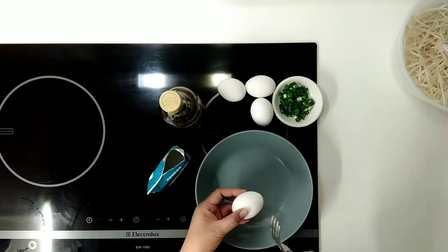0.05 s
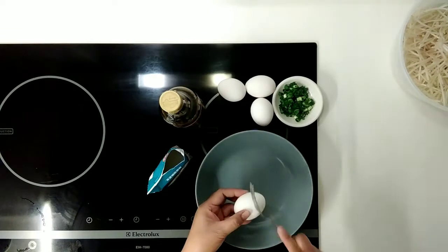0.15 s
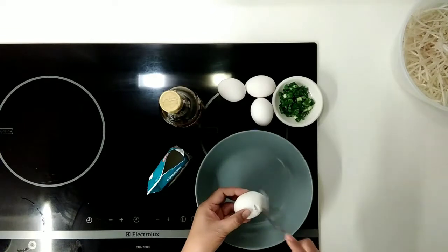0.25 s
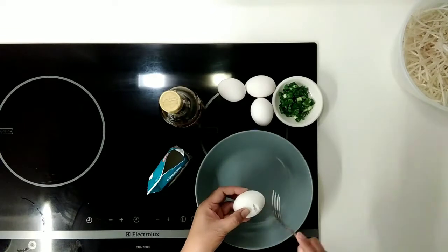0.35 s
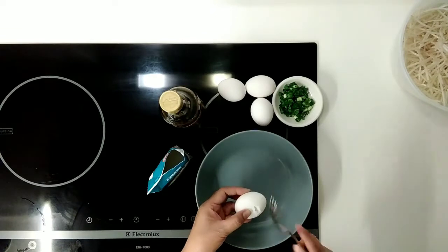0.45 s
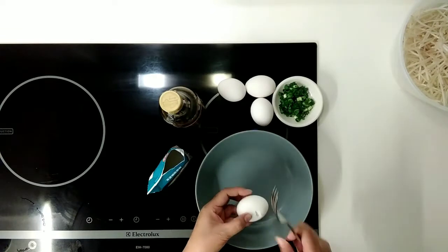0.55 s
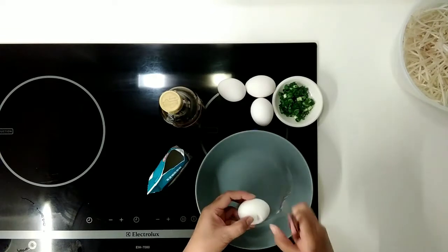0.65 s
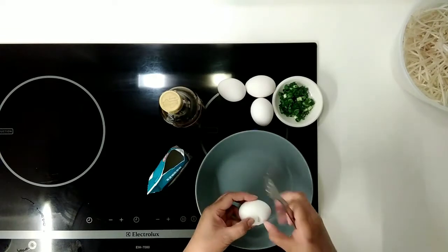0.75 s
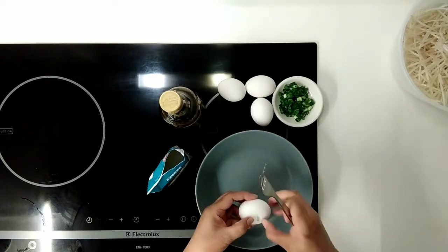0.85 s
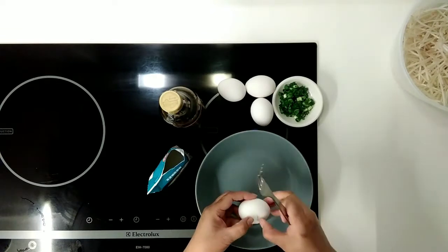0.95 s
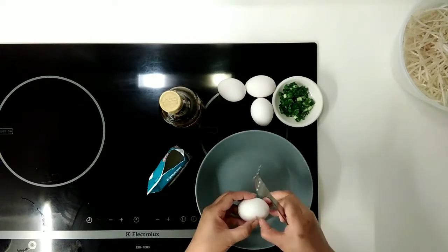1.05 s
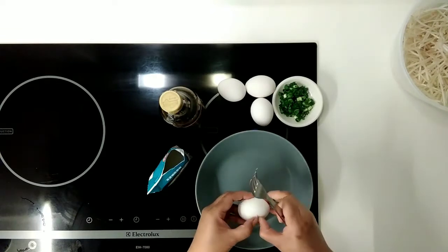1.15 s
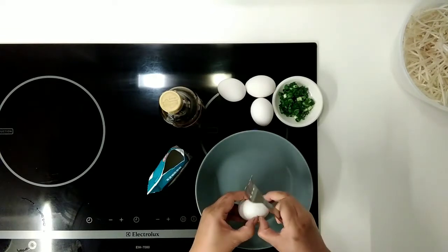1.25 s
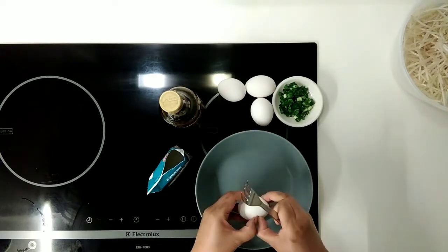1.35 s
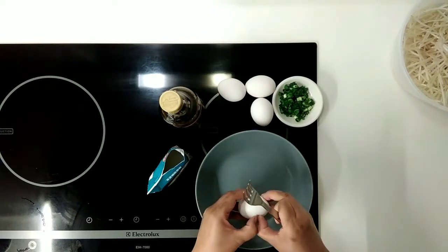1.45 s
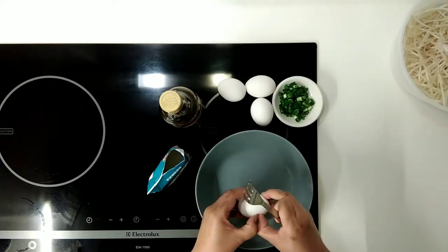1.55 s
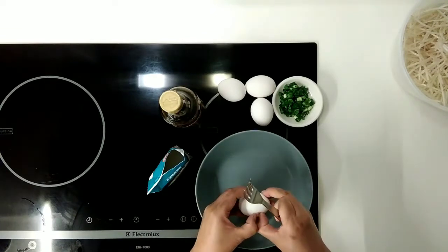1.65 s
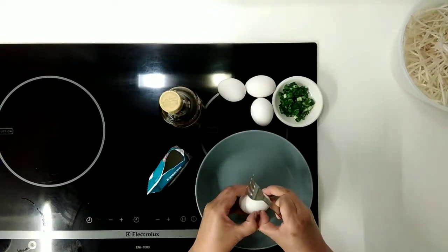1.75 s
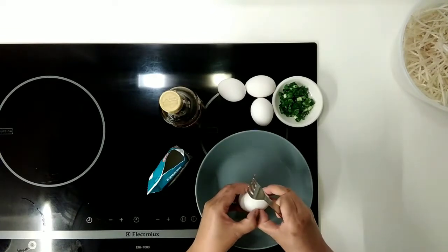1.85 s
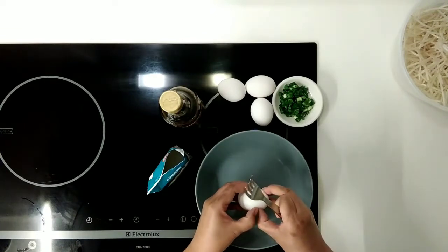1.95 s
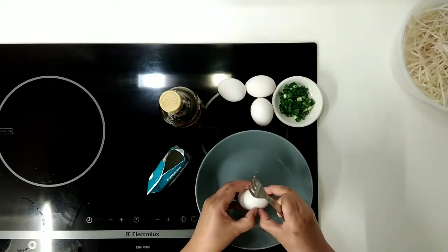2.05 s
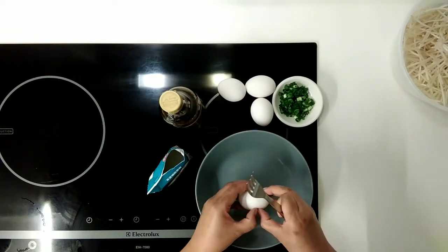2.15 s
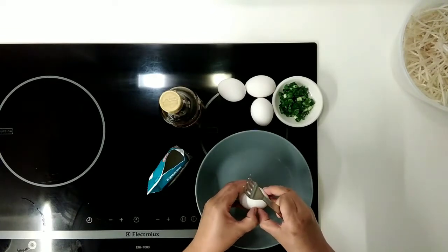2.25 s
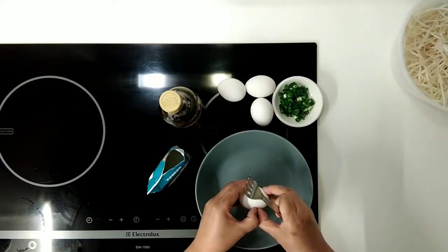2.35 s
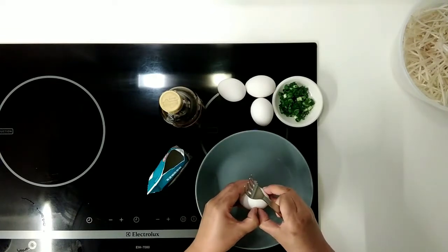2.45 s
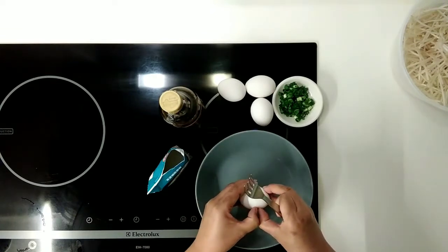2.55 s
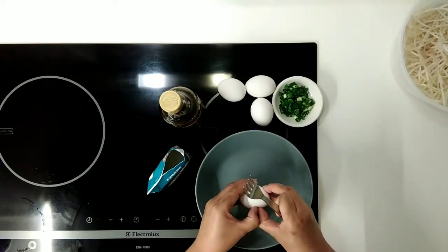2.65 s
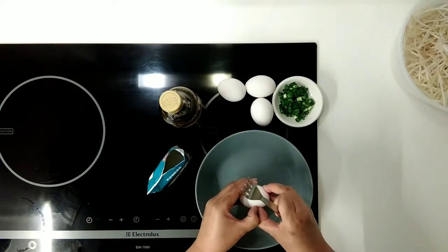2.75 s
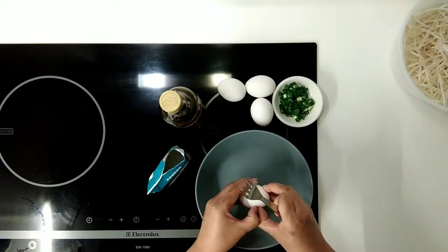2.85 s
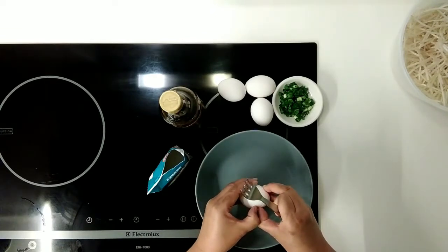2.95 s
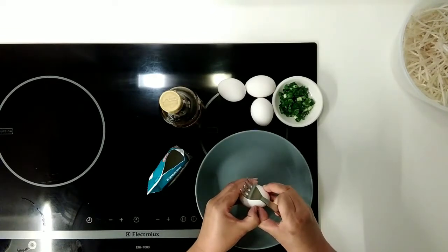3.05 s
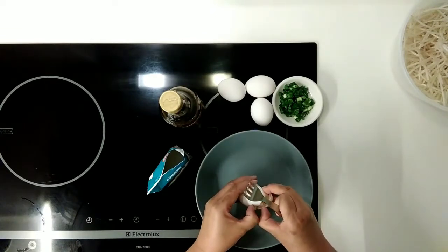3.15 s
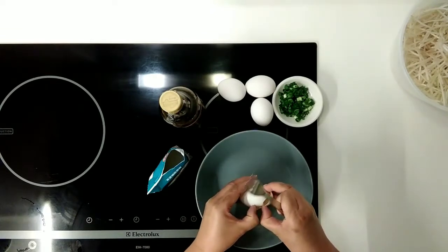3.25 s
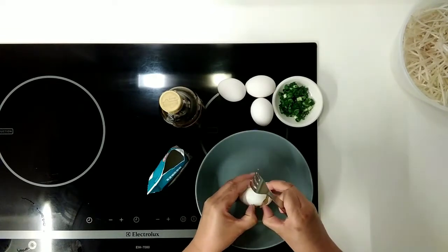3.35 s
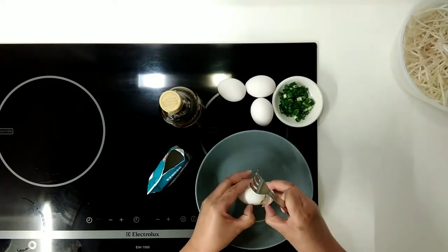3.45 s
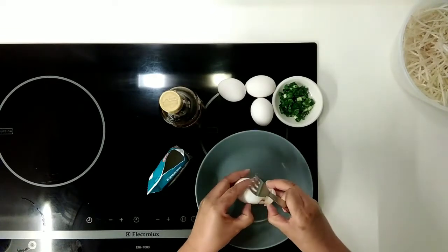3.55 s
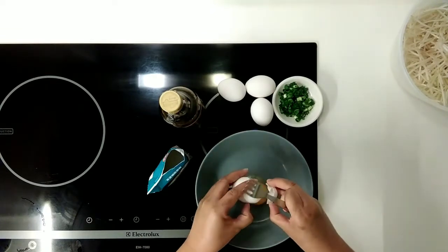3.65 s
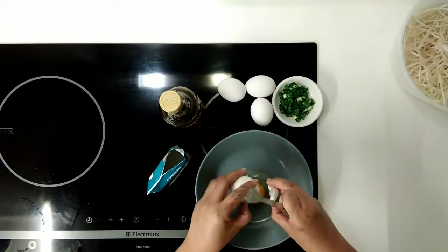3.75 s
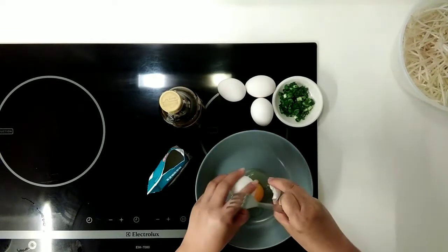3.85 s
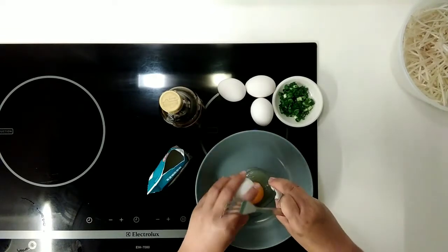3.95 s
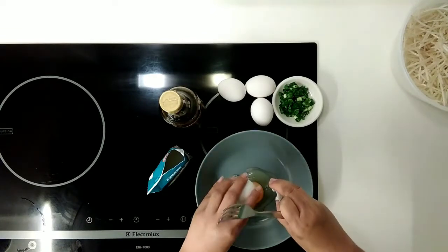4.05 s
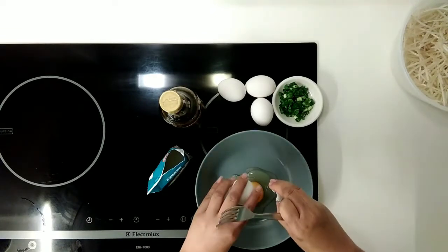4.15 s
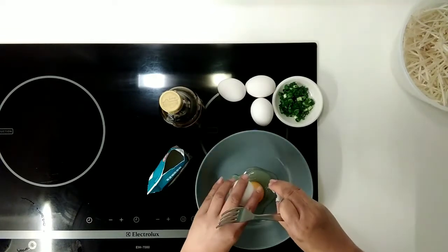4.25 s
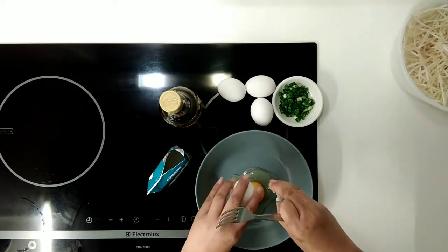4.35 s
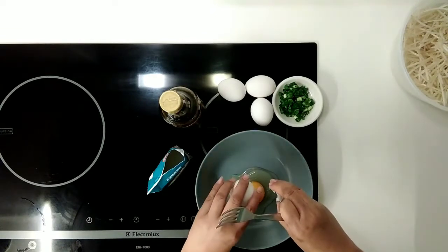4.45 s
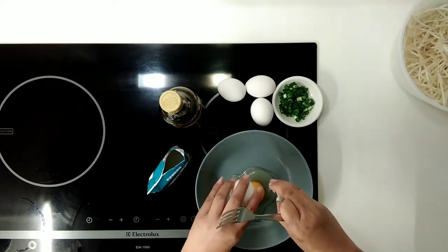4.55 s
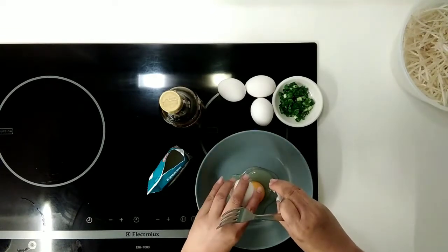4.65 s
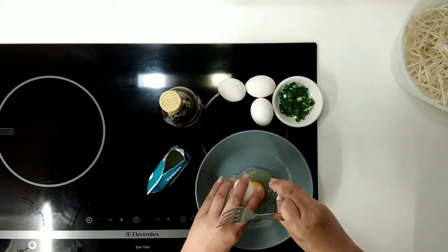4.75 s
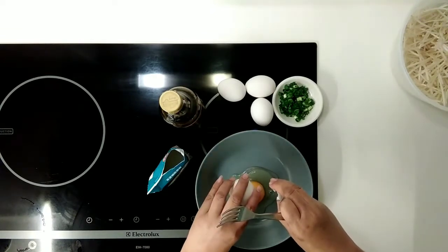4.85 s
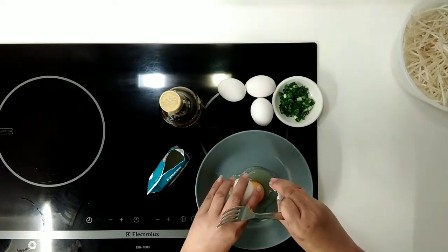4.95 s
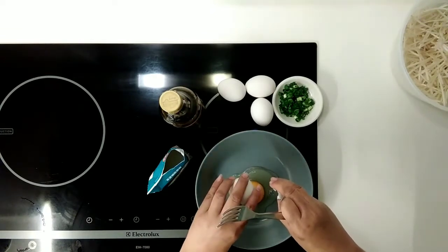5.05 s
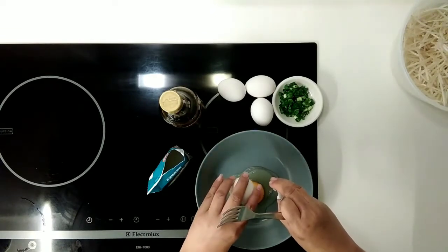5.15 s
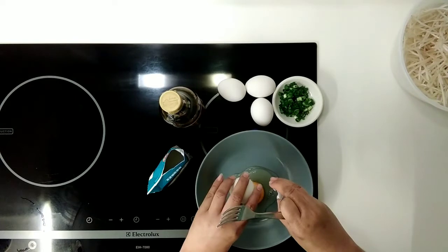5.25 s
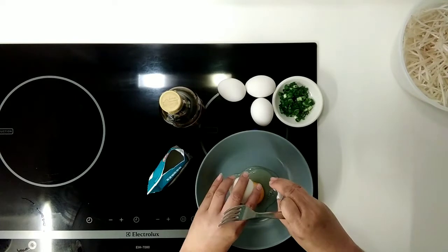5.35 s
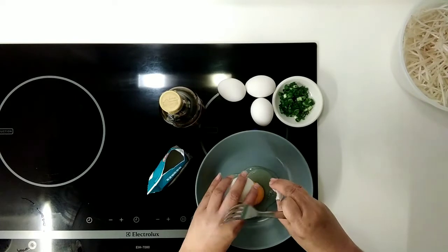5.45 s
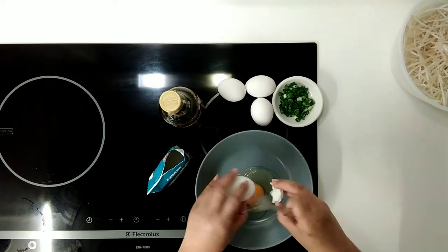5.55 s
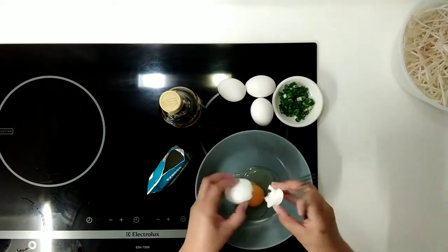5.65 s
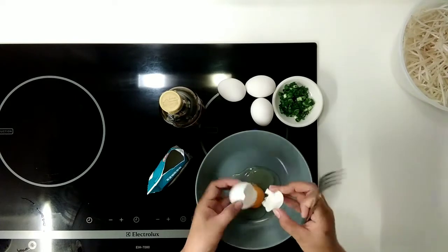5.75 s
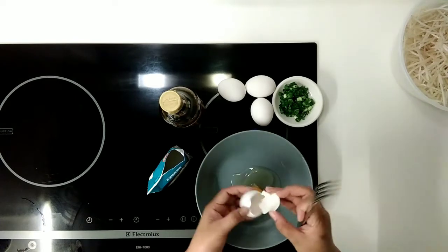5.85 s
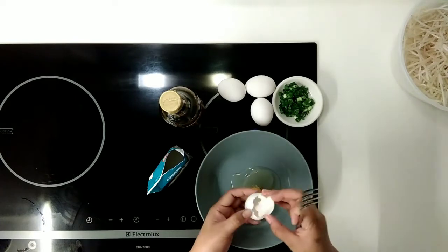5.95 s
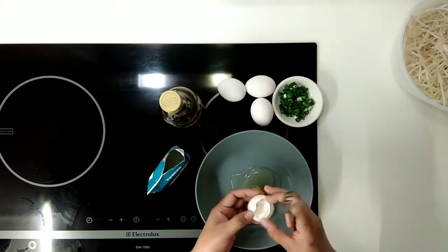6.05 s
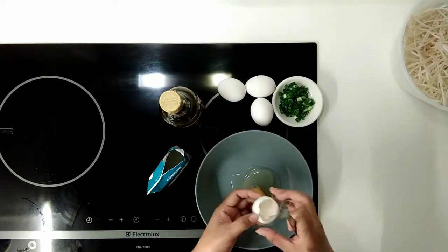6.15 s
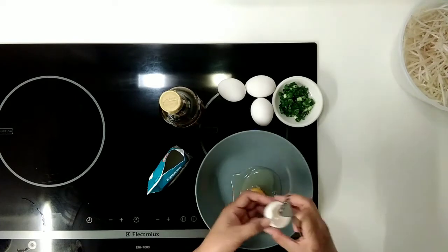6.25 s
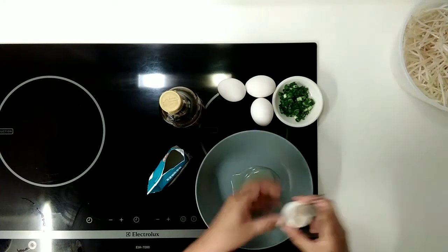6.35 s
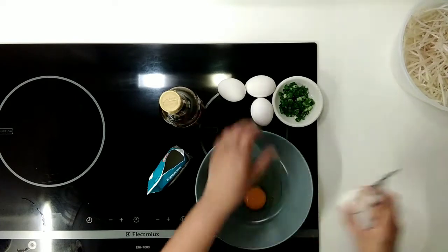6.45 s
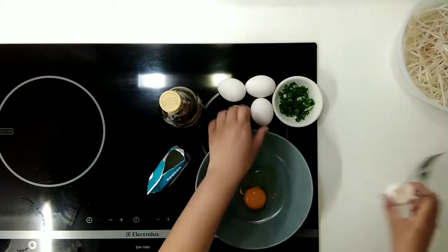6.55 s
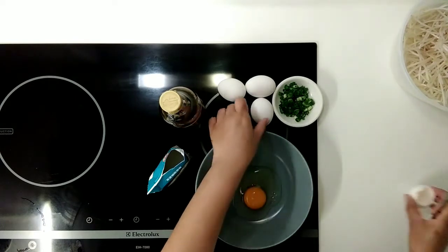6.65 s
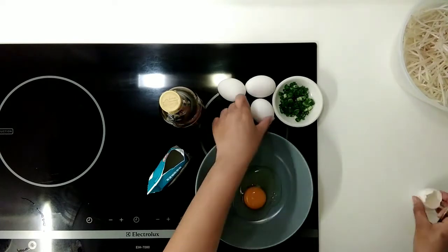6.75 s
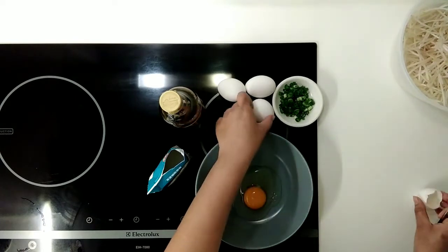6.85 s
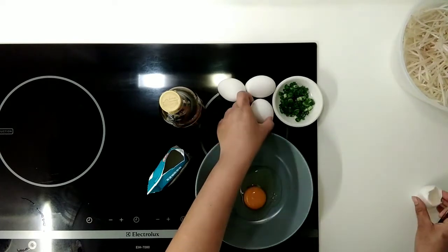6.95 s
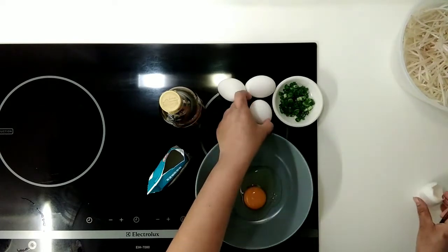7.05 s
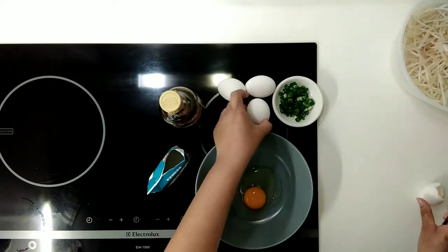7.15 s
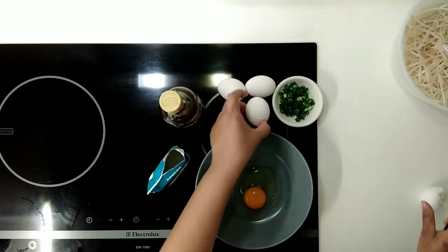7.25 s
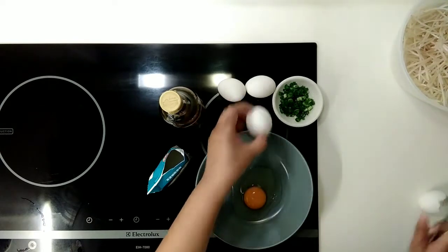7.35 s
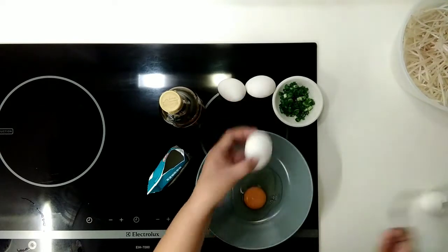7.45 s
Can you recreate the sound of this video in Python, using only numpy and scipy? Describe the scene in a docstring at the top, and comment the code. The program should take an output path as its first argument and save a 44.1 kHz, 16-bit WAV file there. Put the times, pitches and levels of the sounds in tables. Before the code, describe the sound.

In a hard-walled kitchen with faint humming air, a fork strikes an egg with one hard, dense tap and short rattle. Small shell ticks follow, then a tight cluster of bright snaps as the egg is prised open, and later lighter crackles as the halves are nested and set down. Broom-like strokes and soft, low footfalls sound behind. Close shell sounds are heard by a phone above the hob.

```python
"""Humming air in a hard-walled room runs throughout, filtered noise with wavering resonances, and with it a far
broom of rippling noise. A fork strikes an egg: a dense burst, a short rattle and echoes. Soft footfalls pass behind,
noise rumbles over low floor tones. Snaps ringing cup, rim and splinter resonators prise the egg open; its halves
are nested and set down with a last blow. All is heard from a phone above a kitchen hob."""
import sys
import numpy as np
from scipy import signal
from scipy.fft import rfft, irfft
from scipy.io import wavfile
from scipy.ndimage import uniform_filter1d

SR = 44100
rng = np.random.default_rng(int(sys.argv[2]) if len(sys.argv) > 2 else 0)


def gain_from_db(level_db):
    """Turn a decibel level (scalar or array-like) into a linear amplitude factor."""
    decades = np.asarray(level_db, float) / 20
    return 10 ** decades


def pcm_store(signal):
    """Save signal as 16-bit PCM."""
    levels = np.round(np.clip(np.atleast_2d(signal), -1, 1) * 32767)
    wavfile.write(sys.argv[1], SR, levels.astype(np.int16).T)


N = 330750
T = np.arange(N) / SR

# room noise colour, relative density: f/Hz, level/dB
AIR_COLOUR = [(15, -70), (25, -21), (125, -9), (237, -4.5), (301, -5), (335, -8.5), (427, 2.5), (475, -1),
              (691, -7.5), (1060, -7.5), (1150, -6.5), (2700, -16.5), (2930, -17), (13500, -29),
              (15000, -48)]
# appliance resonances: f/Hz, width/Hz, rms level before wavering/dB
HUM_RESONANCES = [(431, 18, -77.5), (718.7, 41, -70), (117, 29, -77.5)]
# broom pushes: t/s, hiss level/dB, scrape level/dB (both under BRISTLE_DB), hold/s, hiss fade/(dB/s)
BROOM_PUSHES = [(-0.03, -66.5, -65.5, 0.0084, 94), (0.174, -68, -65.5, 0.054, 200),
                (0.464, -67, -68, 0.11, 100), (0.591, -57, -52, 0.055, 56),
                (0.666, -41.5, -43.5, 0.01, 150), (0.69, -33, -38, 0.0083, 151),
                (0.864, -34, -35.5, 0.013, 166), (0.972, -46.5, -44, 0.03, 67),
                (1.24, -52.5, -64.5, 0.002, 400), (1.332, -74.5, -77, 0.0082, 95),
                (1.663, -72, -76, 0.034, 200), (1.823, -66, -70.5, 0.033, 200),
                (1.972, -70, -69.5, 0.12, 57), (2.037, -83, -64, 0.014, 155), (2.3, -78, -80, 0.08, 98),
                (2.55, -63, -66, 0.071, 60), (2.66, -76, -55, 0.045, 100), (2.737, -50, -51, 0.01, 101),
                (2.753, -35.5, -37.5, 0.005, 105), (2.838, -42.5, -42, 0.07, 138),
                (3.007, -43.5, -38.5, 0.0083, 130), (3.152, -45, -39.5, 0.037, 190),
                (3.463, -54.5, -55.5, 0.0046, 248.5), (3.761, -60.5, -59.5, 0.019, 200),
                (3.869, -73, -65, 0.043, 105), (4.113, -61.5, -57, 0.039, 176),
                (4.486, -62.5, -64, 0.02, 82.5), (4.605, -42, -46.5, 0.019, 150),
                (4.675, -41.5, -40.5, 0.089, 150), (4.829, -45.5, -39.5, 0.018, 143),
                (4.893, -36, -36, 0.0037, 155), (5.077, -60.5, -55.5, 0.14, 60),
                (5.152, -64, -59.5, 0.016, 17), (5.842, -66, -59.5, 0.024, 127),
                (6.01, -53, -53.5, 0.0045, 205), (6.291, -65.5, -56.5, 0.034, 39),
                (6.485, -70, -66.5, 0.025, 100), (6.627, -62, -57, 0.046, 158),
                (6.795, -61.5, -54, 0.044, 100), (6.941, -66.5, -58, 0.12, 200),
                (7.16, -64.5, -58.5, 0.024, 110), (7.211, -55.5, -52.5, 0.07, 100),
                (7.299, -36.5, -43, 0.015, 100), (7.318, -34.5, -43.5, 0.074, 150),
                (7.449, -47, -42, 0.05, 100)]
# bristle tips, relative density: f/Hz, level/dB
HISS_COLOUR = [(3530, -7), (6000, -4.5), (6560, -7.5), (7370, -4), (9450, -2), (11400, -15.5),
               (14000, -20.5)]
# whole brush, relative density: f/Hz, level/dB
SCRAPE_COLOUR = [(210, -28), (350, -22.5), (416, -4), (485, -17), (709, -8), (891, -9.5), (2530, 3),
                 (4700, -6), (6110, -33), (10300, -120)]
# fork on the full egg, empty shells on the worktop:
# t/s, rms level over a quarter second/dB, hit decay/s, rattle against hit/dB, rattle decay/s
BLOW_HITS = [(0.251, -33.5, 0.0033, -5.5, 0.015), (6.908, -42.5, 0.0031, -11.5, 0.0088)]
# one colour for each blow, relative density: f/Hz, level/dB
BLOW_TONES = [
    [(120, -53.5), (200, -22), (636, -15), (1510, -5.5), (1850, 0), (3470, -6), (4550, -5.5), (5550, -12),
     (8880, -6.5), (14000, -23), (15000, -34.5)],
    [(290, -52), (500, -29), (883, -30.5), (1650, -1.5), (2020, -5), (2360, -7), (2700, -12.5), (5000, -72),
     (6500, -78), (11000, -120)],
]
# echo colour: f/Hz, level/dB
ECHO_COLOUR = [(300, 14), (800, 10), (2000, 0.5), (4400, 4.5), (5600, 6), (8800, 0.5), (11000, -1.5),
               (14000, 1), (16000, -37)]
# footfalls: t/s, rumble level/dB, thump level/dB (both before trim and fade), favoured f/Hz, fall-off/(dB/octave)
FOOTFALLS = [(0.549, -61, -56.5, 97.5, 5.5), (1.799, -80, -58, 130.4, 7.5), (2.481, -71, -47.5, 182.5, 18),
             (4.696, -36, -61.5, 420, 0.5), (5.617, -49, -57, 230, 10), (5.864, -36, -42.5, 420, 10.5),
             (5.884, -37, -45, 206, 21), (6.819, -39.5, -63, 180, 7), (7.329, -66, -67, 230, 0)]
# sole on the boards, relative density: f/Hz, level/dB
RUMBLE_COLOUR = [(120, -19), (300, -15.5), (800, -1.5), (1600, -4), (3000, -28)]
# low modes of the floor: f/Hz, width/Hz, T60/s
FLOOR_MODES = [(96.8, 25, 0.9), (183, 21, 0.42), (268, 56, 0.47), (414, 46, 0.42)]
# shell cracks: t/s, cup f/Hz, then peak levels of cup/dB, rim/dB, splinters/dB
SHELL_CRACKS = [(1.535, 1540, -68, -50.5, -38.5), (1.663, 972, -56, -58, -40.5),
                (1.843, 1150, -76, -54, -52), (1.896, 1710, -47, -43, -37), (2.148, 1000, -53.5, -67, -65),
                (2.491, 926, -74, -58, -44), (3.189, 1670, -24.5, -31, -16), (3.217, 2150, -25, -8, -7),
                (3.234, 1990, -12, -37, -11), (3.285, 1820, -29, -35.5, -15),
                (3.404, 1480, -41, -45, -32.5), (3.428, 1520, -45.5, -58.5, -56),
                (3.478, 1410, -42, -38.5, -53), (3.492, 1517, -42.5, -47.5, -35),
                (3.803, 1660, -51.5, -56, -37.5), (3.855, 1700, -45.5, -48, -28.5),
                (6.034, 1490, -35, -46, -29), (6.061, 1680, -35, -39, -30),
                (6.099, 1600, -31.5, -25, -20.5), (6.125, 1550, -46, -59, -34),
                (6.236, 1700, -27.5, -40, -32), (6.27, 1660, -57, -62, -65)]
# small flakes of shell: f/Hz, width/Hz, relative level/dB
SPLINTER_RESONANCES = [(6700, 750, -8.5), (8460, 2070, 5.5), (12800, 1310, -15)]
# push through the whole egg, relative: f/Hz, level/dB
CLACK_COLOUR = [(300, -17), (600, 1.5), (1200, -0.5), (3000, -4.5), (5000, -7.5), (7000, -42)]
# response shared by both microphone ports: f/Hz, level/dB
MIC_RESPONSE = [(1, 6.5), (4700, 0), (5300, -4), (6200, 1.5), (14200, 3.5), (15200, -17), (22100, -31)]

AIR_DB = -63.5  # rms before wavering
PRESS_S, BRISTLE_DB = 0.028, 1.54  # landing time of the brush; rms of the steady bristle noise
SCRAPE_LINGERS = 0.83  # scrape fade rate as a share of the hiss fade rate
NEAR_T60_S, NEAR_DB = 0.068, -4  # bowl and hob; tail level before colour
WALL_T60_S, WALL_DB = 0.35, -12
RUMBLE_T60_S, RUMBLE_TRIM_DB, THUMP_TRIM_DB = 0.3, -5, 1
WHOLE_RIM_HZ, HALVES_RIM_HZ, SPLIT_S = 3926, 4350, 3.35  # the rim rings higher in halves
CUP_WIDTH_HZ, RIM_WIDTH_HZ = 320, 400
CRUMBLE_S, CLACK_UNDER_RIM_DB = 0.0026, -15.5


def level(x, db):
    """Scale to an rms level in dB."""
    return x * gain_from_db(db) / np.sqrt(np.mean(x ** 2))


def colour(x, points):
    """Filter through (Hz, dB) points, with a steep fall outside them."""
    hz, db = np.transpose(points)
    f = np.fft.rfftfreq(x.shape[-1], 1 / SR) + 1
    gain_db = np.interp(np.log(f), np.log(hz), db, left=-60, right=-60)
    return irfft(rfft(x) * gain_from_db(gain_db), x.shape[-1])


def band(x, hz, width_hz):
    """One resonance, gain 1 at the centre."""
    return signal.lfilter(*signal.iirpeak(hz, hz / width_hz, SR), x)


def walk(rate):
    """Random levels, held 1 / rate seconds and slewed; spread near 1."""
    hold = int(SR / rate)
    held = np.repeat(rng.standard_normal(N // hold + 1), hold)
    return uniform_filter1d(held, hold)[:N]


def pair(alike_hz, x):
    """Left and right from two noises: partly alike in the bass, unrelated in the treble."""
    f = np.fft.rfftfreq(N, 1 / SR)
    shared = 0.65 / (1 + (f / alike_hz) ** 2)
    a, b = rfft(x)
    return irfft(np.array([a, shared * a + np.sqrt(1 - shared ** 2) * b]), N)


def add(out, s, sound):
    """Mix a short sound in at time s."""
    i = int(s * SR)
    out[..., i:i + sound.shape[-1]] += sound[..., :N - i]


def ports(left, right):
    """The right port lies a little further from the hands, so it hears them later."""
    return np.array([left, np.roll(right, SR // 2200)])


def air():
    """Smooth room noise with wavering appliance resonances."""
    noise = pair(527, rng.standard_normal((2, N)))
    out = level(colour(noise, AIR_COLOUR), AIR_DB) * gain_from_db(walk(3))
    for hz, width_hz, db in HUM_RESONANCES:
        hum = band(pair(700, rng.standard_normal((2, N))), hz, width_hz)
        out = out + level(hum, db) * gain_from_db(0.95 * walk(7.6))
    return out


def bristles(points, centres_hz):
    """Slips as noise bunched in grains; narrow room resonances come and go as the brush moves."""
    slips = pair(600, rng.standard_normal((2, N))) * gain_from_db(1.4 * walk(90))
    rippling = sum(gain_from_db(5.35 * walk(14)) * band(slips, hz, hz / 36) for hz in centres_hz)
    return level(colour(rippling, points), BRISTLE_DB)


def broom():
    """Stiff tips hiss, the whole brush scrapes: each push lands, holds and fades; pushes add in power."""
    hiss_power, scrape_power = np.zeros(N), np.zeros(N)
    for s, hiss_db, scrape_db, hold, fade in BROOM_PUSHES:
        landed = np.sin(np.pi / 2 * np.clip((T - s) / PRESS_S, 0, 1)) ** 1.3
        lost_db = fade * np.maximum(T - s - PRESS_S - hold, 0)
        hiss_power += (landed * gain_from_db(hiss_db - lost_db)) ** 2
        scrape_power += (landed * gain_from_db(scrape_db - SCRAPE_LINGERS * lost_db)) ** 2
    hiss = np.sqrt(hiss_power) * bristles(HISS_COLOUR, np.geomspace(4000, 15000, num=30))
    scrape = np.sqrt(scrape_power) * bristles(SCRAPE_COLOUR, np.geomspace(350, 6000, num=56))
    return hiss + scrape


def blows():
    """A hard, dense hit without pitch, then the shell rattles on briefly."""
    out, t = np.zeros((2, N)), T[:SR // 4]
    for (s, rms_db, hit_s, rattle_db, rattle_s), points in zip(BLOW_HITS, BLOW_TONES):
        noise = rng.standard_normal((3, len(t))) * (1 - np.exp(-t / 0.0009))
        hit = noise[:1] * np.exp(-t / hit_s)  # the same at both ports
        rattle = gain_from_db(rattle_db) * noise[1:] * np.exp(-t / rattle_s)
        force = hit + rattle
        force[:, SR // 1000] += 2.2  # first contact
        blow = colour(np.roll(force, SR // 100, axis=1), points)
        add(out, s - 0.01, level(ports(*blow), rms_db))
    return out


def room(x):
    """Dense echoes from bowl and hob die fast, those from the walls slowly; each port hears its own."""
    t = T[:SR // 2]
    tails = 0
    for t60, db in ((NEAR_T60_S, NEAR_DB), (WALL_T60_S, WALL_DB)):
        decaying = rng.standard_normal((2, len(t))) * np.exp(-np.log(1000) * t / t60)
        tails = tails + level(decaying, db)
    echoes = signal.fftconvolve(x, tails / np.sqrt(len(t)), axes=1)[:, :N]
    return colour(echoes, ECHO_COLOUR)


def steps():
    """A soft sole lands in a dull rumble and drives the floor's low modes, most those near its favoured pitch."""
    out, t = np.zeros((2, N)), T[:SR]

    def fade(t60):
        return (1 - np.exp(-t / 0.021)) * np.exp(-np.log(1000) * t / t60)

    for s, rumble_db, thump_db, favoured_hz, fall_db in FOOTFALLS:
        push = rng.standard_normal((3, SR))
        rumble = level(colour(push[:2], RUMBLE_COLOUR), rumble_db + RUMBLE_TRIM_DB)
        step = rumble * fade(RUMBLE_T60_S)
        for hz, width_hz, t60 in FLOOR_MODES:
            # each mode wavers as the weight rolls over the foot
            waver = band(band(push[2], hz, width_hz), hz, 3 * width_hz)
            mode = np.sin(2 * np.pi * hz * t) + 1.17 * waver / waver.std()
            db = thump_db - fall_db * abs(np.log2(hz / favoured_hz))
            step = step + level(mode, db + THUMP_TRIM_DB) * fade(t60)
        add(out, s - 0.012, step)
    return out


def ring(x, hz, width_hz):
    """A shell resonance: a narrow resonator followed by one four times as wide."""
    return band(band(x, hz, width_hz), hz, 4 * width_hz)


def cracks():
    """A snap and crumbling tail ring the shell cup and rim, throw splinters and clack through the egg."""
    out, t = np.zeros((2, N)), T[:SR // 8]
    for s, cup_hz, cup_db, rim_db, splinter_db in SHELL_CRACKS:
        crumble = (1 - np.exp(-t / 0.0016)) * np.exp(-t / CRUMBLE_S)
        snaps = 0.29 * rng.standard_normal((2, len(t))) * crumble
        snaps[:, SR // 700] += 1  # the main break
        snaps = np.roll(snaps, SR // 200, axis=1)
        rim_hz = WHOLE_RIM_HZ if s < SPLIT_S else HALVES_RIM_HZ
        splinters = sum(gain_from_db(db) * ring(snaps, hz, width) for hz, width, db in SPLINTER_RESONANCES)
        parts = ((cup_db, ring(snaps, cup_hz, CUP_WIDTH_HZ)),
                 (rim_db, ring(snaps, rim_hz, RIM_WIDTH_HZ)),
                 (splinter_db, splinters),
                 (rim_db + CLACK_UNDER_RIM_DB, colour(snaps, CLACK_COLOUR)))
        crack = sum(gain_from_db(db) * part / np.abs(part).max() for db, part in parts)
        add(out, s - 0.0055, ports(*crack))
    return out


def scene():
    """Near cracks and blows with their echoes over the far sounds."""
    near = cracks() + blows()
    return near + room(near) + broom() + steps() + air()


def top_cut(x):
    """Nothing passes above the cut-off."""
    return signal.sosfilt(signal.butter(12, 16480, fs=SR, output="sos"), x)


def record(dry):
    """The left port is full in the bass, the right thin and a little dull; both dip near 5 kHz."""
    port_hz, shade_hz = 530, 6500  # bass shelf corner; the phone body shades the right port above the second

    def shelf(bass_db, top_db):
        return [(1, bass_db), (port_hz * 0.79, bass_db), (port_hz * 1.02, 0),
                (shade_hz * 0.7, 0), (shade_hz, top_db), (SR / 2 + 2, top_db)]

    left = colour(dry[0], shelf(5.7, 0.75))
    right = colour(dry[1], shelf(-7, -0.75))
    mix = colour(np.array([left, right]), MIC_RESPONSE)
    return top_cut(mix)


dry = scene()
out = record(dry)
pcm_store(out)
```